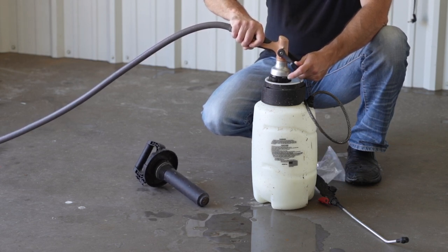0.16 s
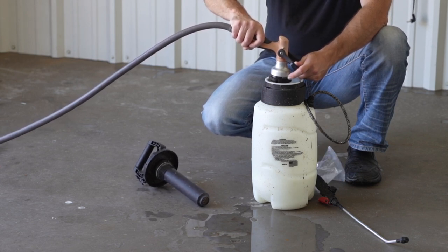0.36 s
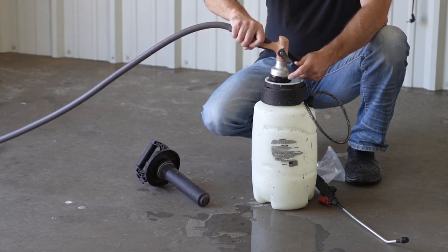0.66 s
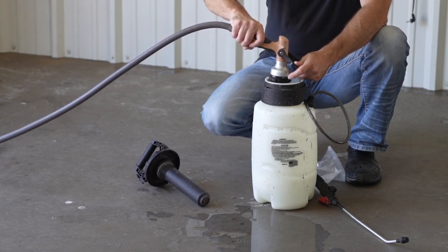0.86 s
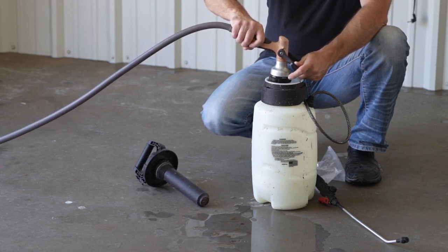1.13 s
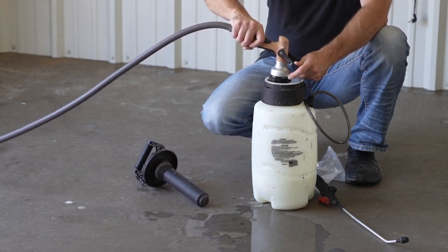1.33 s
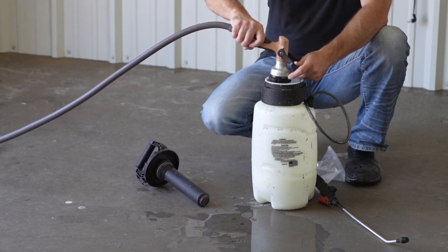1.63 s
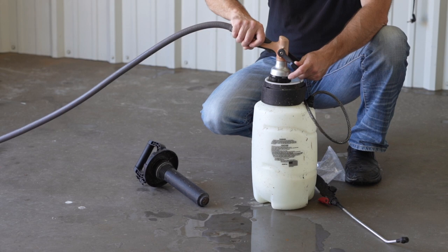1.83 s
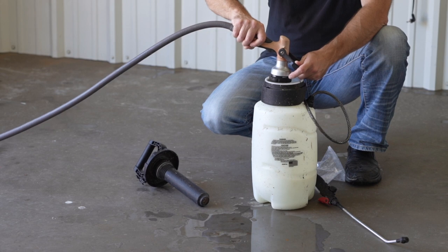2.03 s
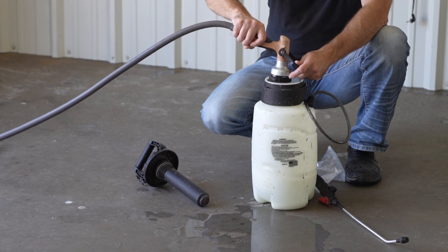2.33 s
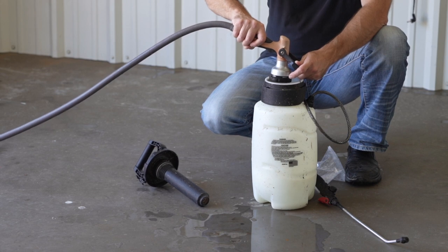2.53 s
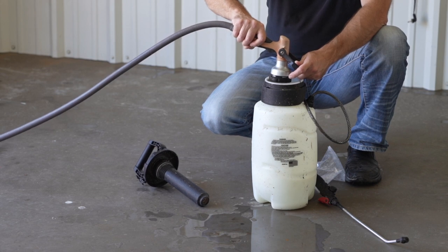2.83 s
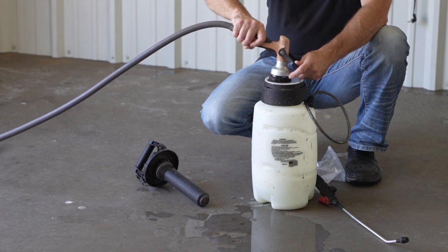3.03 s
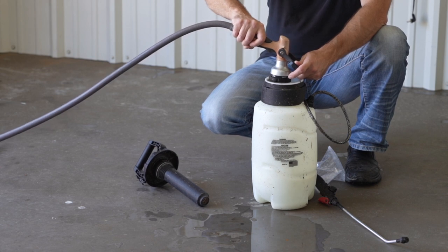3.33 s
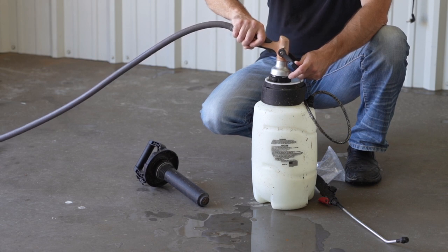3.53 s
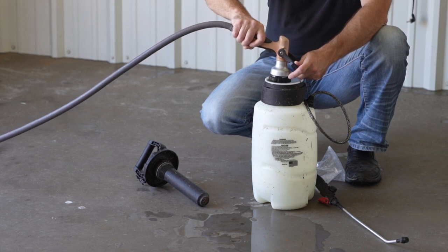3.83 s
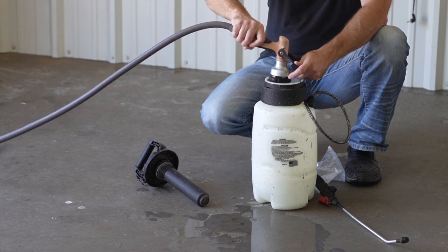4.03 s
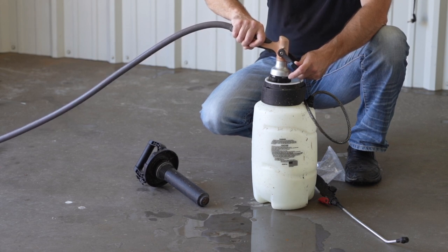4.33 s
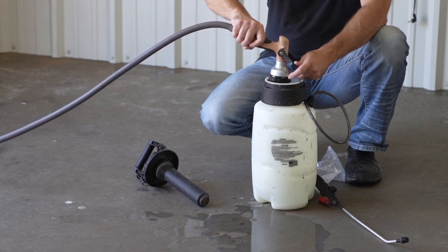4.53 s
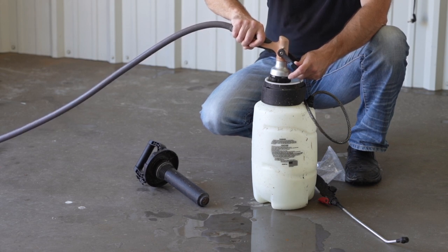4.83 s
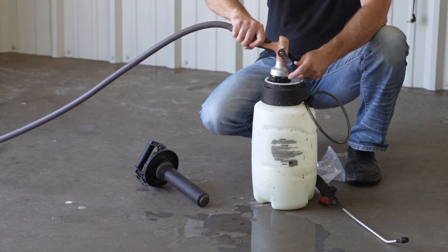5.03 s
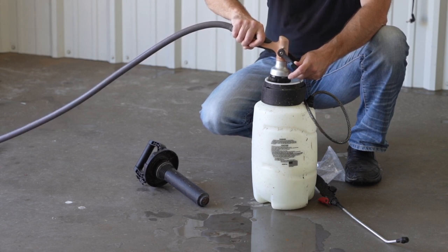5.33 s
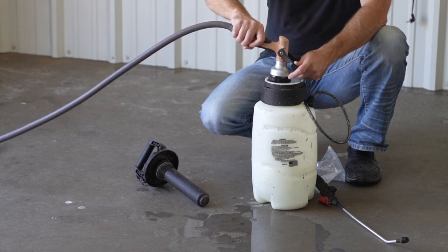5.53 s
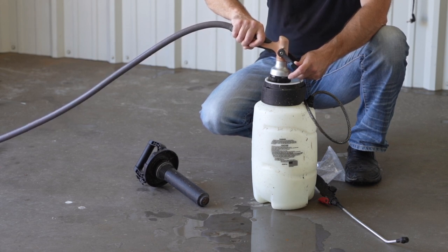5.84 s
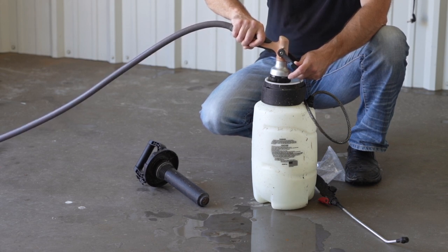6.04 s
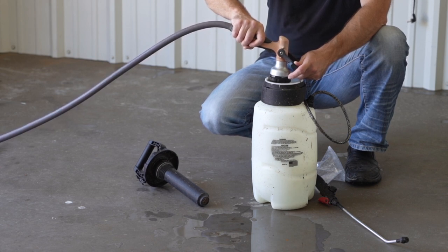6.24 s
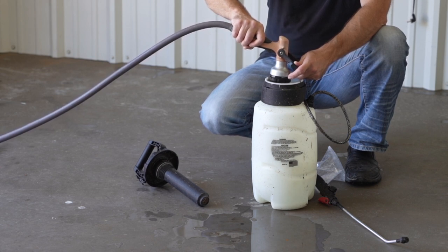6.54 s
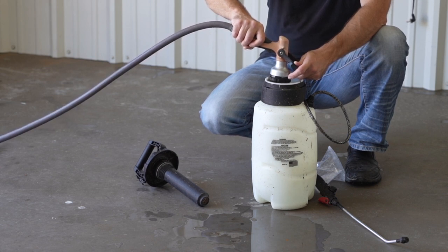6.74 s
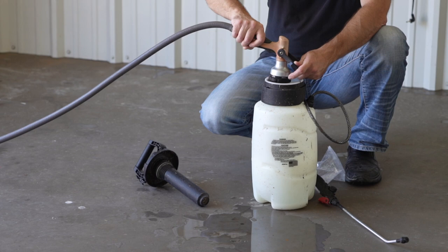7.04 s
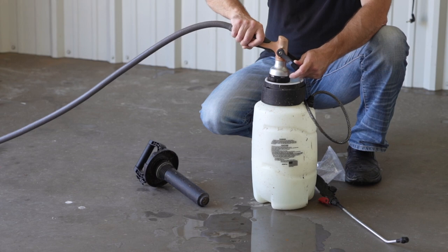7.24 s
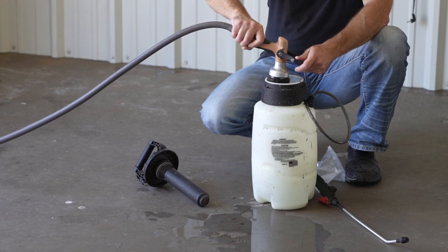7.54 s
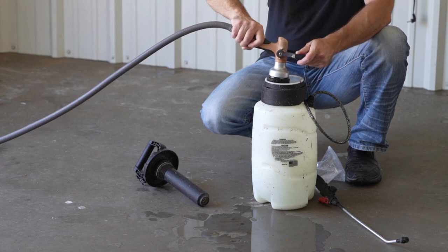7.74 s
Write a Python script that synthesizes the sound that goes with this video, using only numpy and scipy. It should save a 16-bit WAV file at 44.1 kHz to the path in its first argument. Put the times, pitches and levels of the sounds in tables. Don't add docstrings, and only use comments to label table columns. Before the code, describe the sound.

A hose jet hisses steadily into a plastic tank in a bare garage, with wind thumps midway and a low vehicle rumble later.

```python
import sys
import numpy as np
from scipy import signal
from scipy.fft import rfft, irfft, next_fast_len
from scipy.io import wavfile

SR = 44100
rng = np.random.default_rng(int(sys.argv[2]) if len(sys.argv) > 2 else 0)


def gain_from_db(level_db):
    decades = np.asarray(level_db, float) / 20
    return 10 ** decades


def master(y):
    cut = np.clip(np.atleast_2d(y).T, -1, 1)
    pcm = np.round(cut * 32767)
    wavfile.write(sys.argv[1], SR, pcm.astype(np.int16))


N = 347502


def jet(patchy_db, surge_db):
    # pitch in Hz, level in dB per Hz.
    hiss_colour = [(250, -7.5), (600, -7.5), (1100, -6.5), (1600, -2.5), (3500, 1.5), (5500, -1.5),
                   (8500, 3.5), (10200, -1.5), (12800, 0.5), (15500, 3)]
    # pitch in Hz, width in Hz, level in dB at start, half
    jet_modes = [(783, 59, -26.5, -64, -48), (904, 110, -21.5, -28, -23), (1195, 53, -29, -23, -25),
                 (1345, 143, -18.5, -18, -16), (1281, 76, -20, -24, -25), (1463, 90, -26, -28.5, -52),
                 (1955, 330, -17, -18, -13.5), (1720, 86, -21.5, -19.5, -21), (2260, 590, -14.5, -12, -10),
                 (2938, 210, -26, -21, -17.5), (3230, 110, -36, -22, -33), (4244, 500, -12, -12, -14.5),
                 (4575, 520, -10.5, -12.5, -11),
                 (4867, 150, -17.5, -20, -18), (5200, 70, -22.5, -21, -19),
                    (5750, 360, -14.5, -18.5, -22), (6310, 250, -20, -13.5, -14),
                    (6624, 320, -15.5, -9, -7.5), (7350, 320, -20, -17.5, -13),
                    (7730, 310, -12, -14, -11.5), (8180, 800, -16, -13, -12),
                    (8900, 360, -11.5, -20, -14.5), (11100, 400, -16, -14.5, -21),
                    (11630, 320, -44, -19, -15), (12270, 470, -23, -16.5, -18), (13600, 400, -37, -21, -14),
                    (14700, 500, -42, -31, -19)]
    # time in seconds, level in dB.
    flow = [
        (0, -32),
        (1.5, -32.5),
        (3.1, -33),
        (4.6, -35),
        (5.5, -34.5),
        (6.4, -35.5),
        (7.0, -35.5),
        (7.35, -34.5),
        (7.7, -34.8),
        (7.88, -36.5),
    ]
    hiss_db, = in_time(flow)
    t = np.arange(N) / SR
    draw_up_s, draw_up_takes_s = 6.94, 0.84
    drawn = np.clip((t - draw_up_s) / draw_up_takes_s, 0, 1)
    spray_db = 0.2 * (t - t.mean()) - 2.5 * drawn
    splash_db = -0.11 * (t - t.mean()) - 1 * drawn
    together_db = surge_db * (drift(3.3) + 0.18 * drift(5.7))

    def tilt_db(hz):
        return spray_db * (hz > 9500) + splash_db * (hz < 3000)

    out = np.zeros(N)
    white = rng.standard_normal((2, N))
    edges = np.geomspace(200, 17000, 21)
    colour_hz, colour_db = np.transpose(hiss_colour)
    for k, (low, high) in enumerate(zip(edges, edges[1:])):
        band_filter = signal.butter(2, [low, high], "band", fs=SR, output="sos")
        band = signal.sosfilt(band_filter, white[k % 2])
        hz = np.sqrt(low * high)
        band_db = np.interp(np.log(hz), np.log(colour_hz), colour_db)
        flicker_db = patchy_db * (1 - 0.34 * (hz > 9500)) * drift(25)
        out += band * gain_from_db(band_db + tilt_db(hz) + flicker_db)
    for hz, width_hz, *levels_db in jet_modes:
        filling_db = np.interp(np.arange(N), [0, N / 2, N], levels_db)
        flicker_db = (1.26 - 0.7 * (hz > 9500)) * drift(4.9)
        mode_db = filling_db - 5 * drawn + tilt_db(hz) + flicker_db
        out += resonant_noise(hz, width_hz) * gain_from_db(mode_db)
    return out * gain_from_db(hiss_db + together_db)


def tank():
    # time in seconds, length in seconds, level in dB.
    whistle_times = [(2.44, 0.14, -46.5), (2.56, .1, -48), (2.67, 0.12, -45.5), (2.9, 0.14, -52),
                     (3.3, 0.066, -47), (3.51, 0.091, -46.5), (3.72, 0.14, -50.5), (4.25, 0.22, -52),
                     (5.3, 0.28, -50.5), (5.65, .3, -51.5), (6.1, 0.36, -53), (6.55, .15, -54),
                     (6.78, 0.15, -54), (7.22, 0.051, -52), (7.45, 0.092, -49), (7.8, .1, -57)]
    # time in seconds, length in seconds, level in dB.
    neck_rings = [
        (7.15, .16, -45.5),
        (7.45, 0.23, -46.5),
    ]
    t = np.arange(N) / SR
    start_hz, full_at_s = 793, 42
    hz = start_hz / (1 - t / full_at_s)
    hz = hz * (1 + 0.005 * drift(4))
    column_wakes_s = 0.76
    waking = np.clip(0.54 + 0.8 * t / column_wakes_s, 0, 1)
    breath = gliding_noise(hz, width_hz=51) * gain_from_db(-56.5 + 2.3 * drift(8.5)) * waking
    clear = evened(gliding_noise(hz, width_hz=24), share=0.5)
    whistle = clear * swells(whistle_times) * gain_from_db(1.2 * drift(8.8))
    drowned_s, hollow_attack_s = 1.6, 0.13
    hollow_db = -56.5 - 2 * t - 30 * np.maximum(t - drowned_s, 0)
    hollow = evened(resonant_noise(393, 44), share=0.26) * gain_from_db(hollow_db + 1.2 * drift(9))
    hollow = hollow * np.clip(0.2 + t / hollow_attack_s, 0, 1)
    ring = resonant_noise(2120, 260) * swells(neck_rings)
    return breath + whistle + hollow + ring


def garage(x):
    # delay in milliseconds, gain as a plain factor.
    wall_echoes = [(5.87, -0.067), (9.8, 0.0028), (10.18, 0.14), (11.38, 0.14), (14.38, -0.27),
                   (26.35, 0.14)]
    t60_s, tail_db, wall_cut_hz = 0.47, -10.5, 6700
    t = np.arange(SR // 2) / SR
    tail = rng.standard_normal(len(t)) * gain_from_db(-60 * t / t60_s) * (t > 0.002)
    tail = gain_from_db(tail_db) * tail / np.sqrt(np.sum(tail ** 2))
    for ms, gain in wall_echoes:
        tail[round(ms * SR / 1000)] += gain
    response = signal.lfilter(*signal.butter(1, wall_cut_hz, fs=SR), tail)
    response[0] = 1
    lead = np.concatenate([x[len(t):0:-1], x])
    return signal.fftconvolve(lead, response)[len(t):len(t) + N]


def wind(lumpy_db):
    # time in seconds, level in dB.
    draught = [(0, -48), (.33, -51), (1.9, -46), (2.16, -35), (2.3, -39.5), (2.69, -32.5), (2.92, -36.5),
               (3.25, -42), (3.38, -32), (3.56, -39), (3.76, -34.5), (3.83, -23), (4.04, -46), (4.45, -38),
               (4.56, -45), (5.97, -46.5), (6.6, -56), (7.88, -59)]
    # time in seconds, peak in dB, pitch in Hz, length in ms.
    pushes = [(.333, -31, 34, 38), (.436, -31, 32, 26), (1.608, -28, 36.4, 45), (2.077, -24, 63, 7),
              (2.08, -18, 130, 6.4), (2.125, -21, 62.3, 22), (2.24, -19.5, 54, 17), (2.296, -25.5, 49, 67),
              (2.597, -18, 41, 36), (2.795, -22.5, 45.3, 24), (3.088, -17, 43, 9.9), (3.14, -15, 48.5, 16),
              (3.154, -22, 49, 9.7), (3.336, -3, 59, 12.4), (3.362, -14, 46.6, 9.6), (3.39, -13.5, 45, 12),
              (3.431, -22, 108, 17), (3.569, -23, 55, 18), (3.592, -23, 61, 17), (3.784, -12, 68, 21),
              (3.815, -20, 65, 22), (3.853, -16, 88, 12), (3.911, -22, 111, 12), (4.108, -21.5, 45.6, 25),
              (4.215, -19.5, 52.5, 8.3), (4.366, -24, 55, 8.8), (5.315, -31, 37, 18)]
    # time in seconds, peak in dB, pitch in Hz, length in ms.
    pulls = [(0.677, -21, 44, 21), (.815, -31.5, 41, 26), (1.926, -26.5, 41, 19), (2.03, -25.5, 62, 8.2),
             (2.104, -19, 58, 29), (3.119, -18, 51.7, 12), (3.203, -20, 47, 25), (3.265, -12, 55, 20),
             (3.278, -15, 64, 15.5), (3.409, -17, 38, 11), (3.437, -10, 52.6, 39), (3.455, -27, 105, 13),
             (2.16, -35, 100, 16), (3.724, -16, 51, 12), (3.755, -17, 52, 15), (3.838, -21, 113, 17),
             (3.87, -13, 73, 6.9), (3.899, -22, 82, 8.9), (3.962, -29, 44, 27), (4.082, -27, 57, 16),
             (4.193, -20.5, 36, 28), (4.243, -25.5, 39, 40), (4.391, -21.5, 44, 9), (4.887, -30, 35, 29),
             (5.133, -29, 38, 27), (5.217, -29, 38, 47)]
    draught_db, = in_time(draught)
    low_band = signal.butter(2, [20, 65], "band", fs=SR, output="sos")
    lumpy = signal.sosfilt(low_band, rng.standard_normal(N + SR))[SR:] * gain_from_db(lumpy_db * drift(22))
    out = rms_one(lumpy) * gain_from_db(draught_db - 1.5)
    t = np.arange(-SR // 10, SR // 10) / SR
    for way, eddies in ((1, pushes), (-1.04, pulls)):
        for s, peak_db, hz, ms in eddies:
            bell = np.exp(-np.log(16) * (t * 1000 / ms / 0.94) ** 2)
            puff = bell * np.cos(2 * np.pi * 0.87 * hz * t + 0.22)
            out[round(s * SR) - SR // 10:][:len(t)] += way * gain_from_db(peak_db) * puff
    return signal.sosfiltfilt(signal.butter(1, 11, "high", fs=SR, output="sos"), out)


def traffic():
    # pitch in Hz, width in Hz, level in dB while far, nearing, leaving.
    boom_modes = [(93.5, 13, 2.5, 5.5, -3), (112.3, 19, 3, -8, 1), (144, 15, -8.5, -19.5, -8)]
    # pitch in Hz, width in Hz, level in dB.
    overtone_modes = [(210, 24.3, -1.5), (253.6, 42, -5)]
    # time in seconds, rumble in dB, overtone share in dB.
    nearness = [
        (0, -56, -5.5),
        (2.6, -52.5, -13),
        (4.4, -53.5, -18.5),
        (5.2, -46, -17.5),
        (6.2, -46.5, -19.5),
        (7.88, -46, -7.5),
    ]
    # time in seconds, length in seconds, level in dB.
    bumps = [(.2, .3, -55), (1.08, 0.36, -48.5), (2.1, 0.18, -53), (3.2, .12, -50), (3.33, .1, -45),
             (4.1, 0.13, -43.5), (4.28, 0.22, -44.5), (4.5, 0.022, -38.5), (4.77, .12, -36),
             (4.88, 0.049, -41.5), (5.05, 0.093, -35), (5.2, 0.14, -35.5), (5.37, 0.13, -39),
             (5.55, 0.044, -44), (5.67, .03, -41), (5.73, 0.039, -33), (5.83, 0.11, -36),
             (5.92, 0.033, -41), (6.08, 0.1, -45), (6.22, 0.094, -34), (6.33, 0.045, -33), (6.45, .12, -37),
             (6.56, 0.23, -37), (6.9, 0.14, -48), (7.0, 0.15, -41), (7.21, 0.075, -32), (7.4, 0.13, -39.5),
             (7.56, 0.11, -37.5), (7.8, .1, -57)]
    rumble_db, overtone_db = in_time(nearness)
    t = np.arange(N) / SR
    low, high = np.zeros(N), np.zeros(N)
    for hz, width_hz, *levels_db in boom_modes:
        low += resonant_noise(hz, width_hz) * gain_from_db(np.interp(t, [2.5, 5.3, 7.2], levels_db))
    for hz, width_hz, db in overtone_modes:
        high += resonant_noise(hz, width_hz) * gain_from_db(db)
    low = rms_one(low) + gain_from_db(-7) * resonant_noise(103, 55)
    loudness = np.hypot(gain_from_db(rumble_db), swells(bumps)) * gain_from_db(1.64 * drift(42))
    out = evened(rms_one(low), share=0.3) * loudness
    out += evened(rms_one(high), share=0.71) * loudness * gain_from_db(overtone_db + 1.63 * drift(7.5))
    return signal.sosfilt(signal.butter(4, 62, "high", fs=SR, output="sos"), out)


def rms_one(x):
    return x / np.sqrt(np.mean(x ** 2) + 1e-20)


def in_time(rows):
    s, *columns = np.transpose(rows)
    return [np.interp(np.arange(N) / SR, s, c) for c in columns]


def drift(rate):
    r = np.exp(-80 * np.pi * rate / SR)
    slow = signal.lfilter([1], [1, -2 * r, r * r], rng.standard_normal(N // 40 + 4002))[4000:]
    return np.interp(np.arange(N) / 40, np.arange(len(slow)), rms_one(slow - slow.mean()))


def resonant_noise(hz, width_hz):
    r = np.exp(-np.pi * width_hz / SR)
    stage = [1, 0, -1, 1, -2 * r * np.cos(2 * np.pi * hz / SR), r * r]
    return rms_one(signal.sosfilt([stage, stage], rng.standard_normal(N + 8000))[8000:])


def gliding_noise(hz, width_hz):
    phase = 2 * np.pi * np.cumsum(hz) / SR
    return rms_one(drift(width_hz) * np.cos(phase) + drift(width_hz) * np.sin(phase))


def evened(x, share):
    envelope = np.abs(signal.hilbert(x, next_fast_len(N))[:N])
    return rms_one(x / (envelope + 1.0) ** np.clip(share, 0, 1))


def swells(rows):
    t = np.arange(0, N + 40, 40) / SR
    power = np.zeros(len(t))
    for s, length_s, db in rows:
        power += gain_from_db(2 * db) * np.exp(-np.log(16) * ((t - s) / length_s) ** 2)
    return np.interp(np.arange(N) / SR, t, np.sqrt(power))


def scene():
    water = garage(jet(patchy_db=1.25, surge_db=0.11) * gain_from_db(0.5)) + tank()
    mono = water + wind(lumpy_db=3.5) + traffic()
    return np.stack([mono, mono])


def low_pass(x):
    return signal.sosfilt(signal.butter(12, 15910, fs=SR, output="sos"), x)


def record(dry):
    patches, frame, first = 38, 2048, 805
    lowest_hz, highest_hz, width_hz = 4200, 14500, 1350
    side = np.zeros(N + frame)
    hz = np.arange(frame // 2 + 1) * SR / frame
    fade = signal.windows.kaiser_bessel_derived(frame, 4 * np.pi)
    places = rng.random((patches, 2))
    noises = rng.standard_normal((patches, frame))
    for (when, where), noise in zip(places, noises):
        low_hz = lowest_hz + where * (highest_hz - lowest_hz)
        start = first + (2 + int(when * (2 * N // frame - 4))) * frame // 2
        band = (hz > low_hz) & (hz < low_hz + width_hz)
        before = rfft(dry[0, start - frame:start])[band]
        level = np.sqrt(np.mean(np.abs(before) ** 2) / frame)
        side[start:start + frame] += irfft(rfft(noise) * band) * level * fade * gain_from_db(-3.5)
    top_cut = signal.ellip(12, 0.3, 60, 15730, fs=SR, output="sos")
    mix = signal.sosfilt(top_cut, dry + side[:N] * [[1], [-1]])
    return low_pass(mix)


dry = scene()
out = record(dry)
master(out)
```